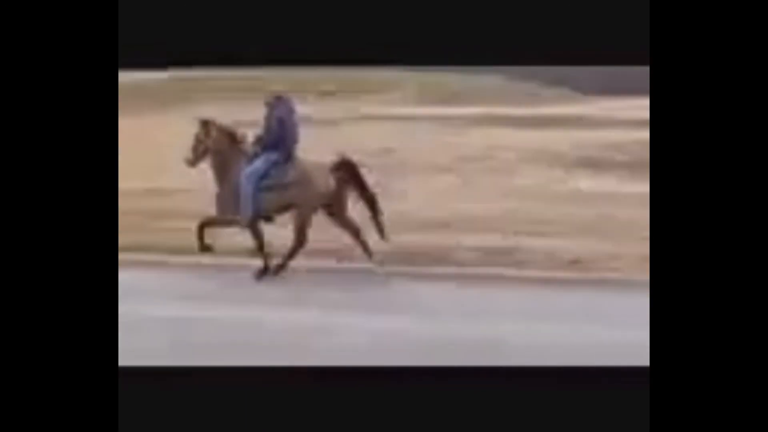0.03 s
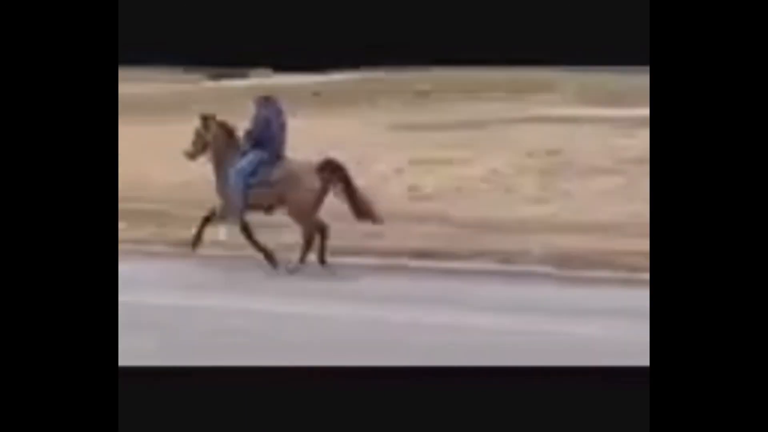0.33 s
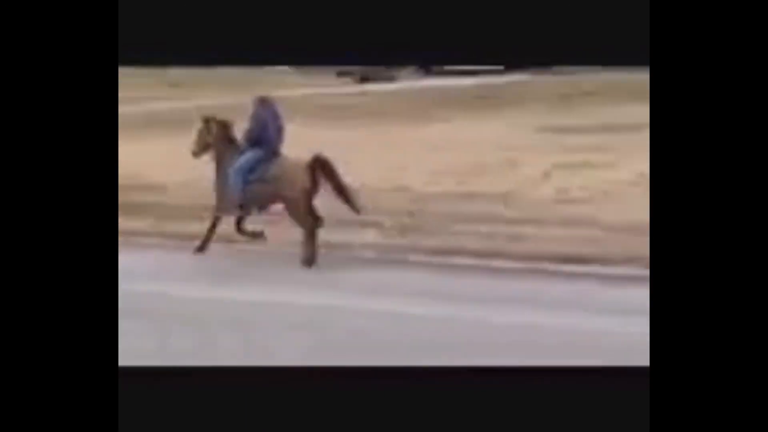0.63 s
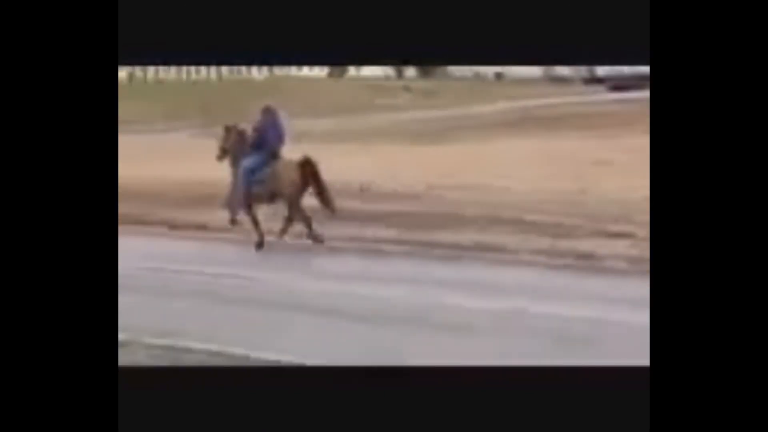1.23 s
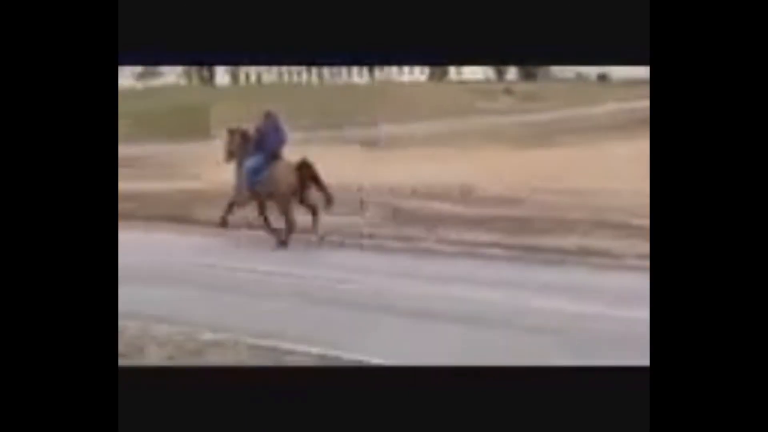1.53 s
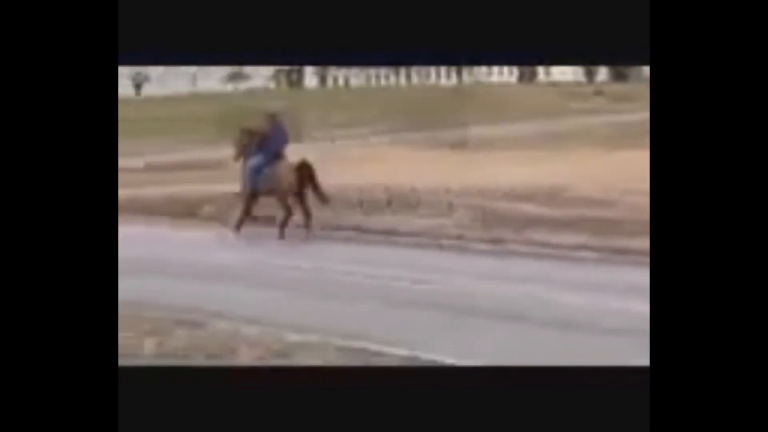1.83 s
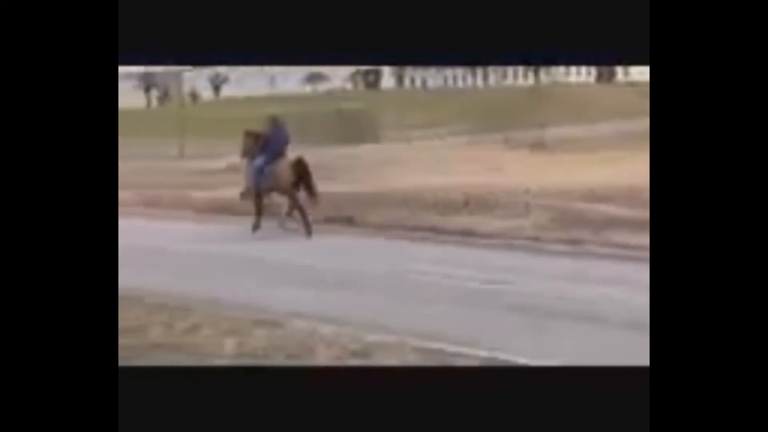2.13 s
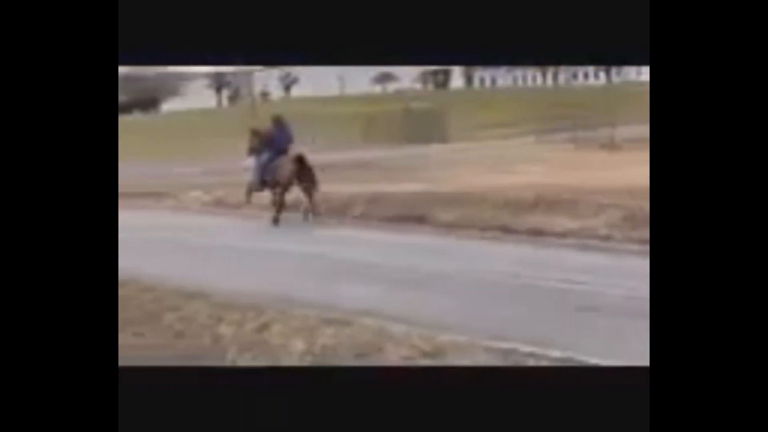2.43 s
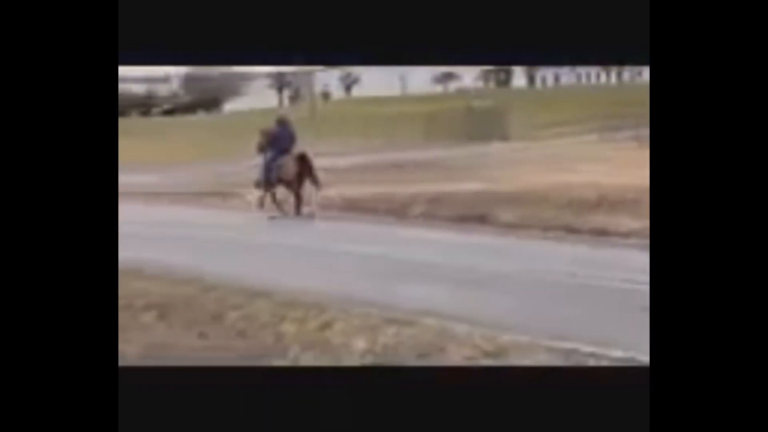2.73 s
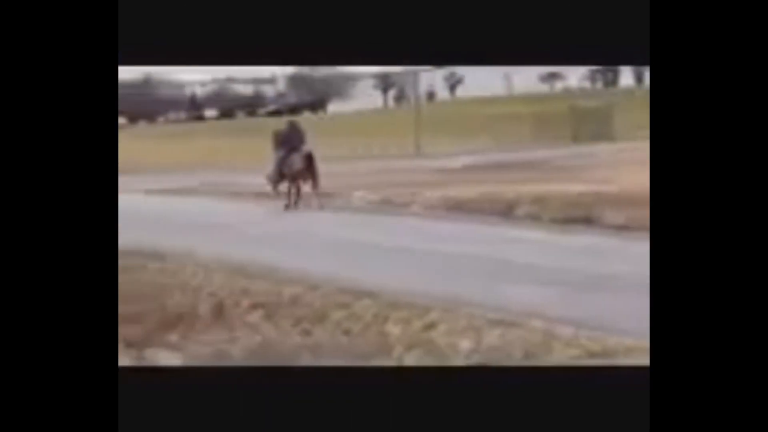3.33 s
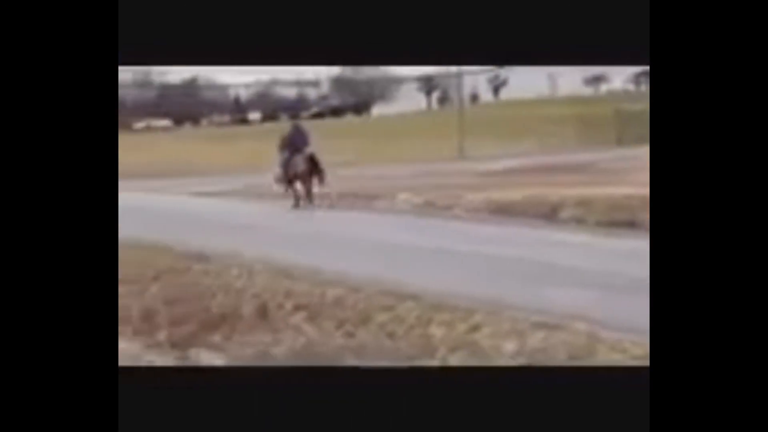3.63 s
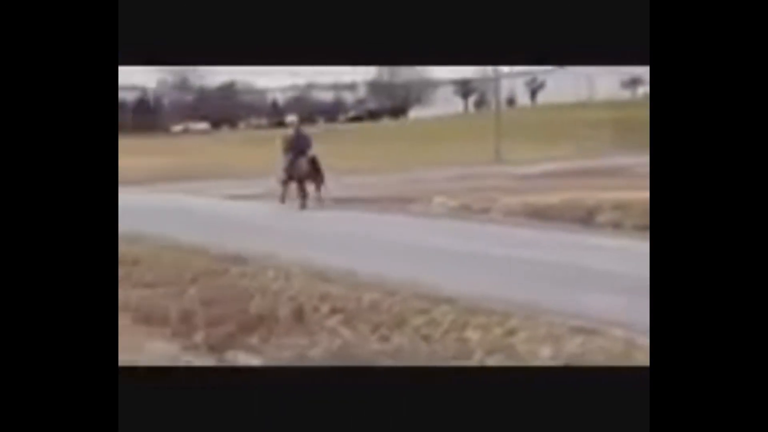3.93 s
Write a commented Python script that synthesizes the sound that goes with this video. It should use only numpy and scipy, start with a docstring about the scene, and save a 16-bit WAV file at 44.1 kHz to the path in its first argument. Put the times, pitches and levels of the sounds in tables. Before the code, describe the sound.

A horse's hooves clop on a paved road in a quick, even rhythm, each step with a little grit. The beats thin slightly as it moves away from the microphone, over faint swishes and a low outdoor rumble.

```python
"""A ridden horse moves away along a paved road at a quick, even four-beat gait, outdoors.
Each hoof touches with one edge, then lands flat: the hoof and the hollow under it ring with a clop
while a little grit grinds on the road. The verge throws back a thin tail. Faint swishes fall between
the beats, over a bed of low rumble and hiss with a few soft bumps of wind."""
import sys
import numpy as np
from scipy import signal
from scipy.fft import rfft, irfft
from scipy.io import wavfile

SR = 44100
rng = np.random.default_rng(int(sys.argv[2]) if len(sys.argv) > 2 else 0)


def pcm_store(signal):
    """Save signal as 16-bit PCM."""
    levels = np.round(np.clip(np.atleast_2d(signal), -1, 1) * 32767)
    wavfile.write(sys.argv[1], SR, levels.astype(np.int16).T)


N = 176400
TIME = np.arange(N) / SR

# EQ curve of the outdoor rumble: f/Hz, level/dB
RUMBLE_EQ = [(25, -33.5), (50, -18), (65, -6.5), (82, 1.5), (115, -4), (150, -10), (220, -13.5), (320, -29),
             (600, -37.5)]
# EQ curve of the airy hiss: f/Hz, level/dB
AIR_EQ = [(150, 2), (900, 0.5), (1600, -6), (2600, -9), (4000, -31.5), (4700, -33), (5400, -49.5),
          (11000, -46.5)]
# cues for the bumps of wind: t/s, level/dB
WIND_CUES = [(1.708, -35), (2.422, -32.5), (2.602, -29.5), (2.727, -28.5), (3.04, -35), (3.885, -39.5)]
# cues for the swishes: t/s, relative level/dB
SWISH_CUES = [(0.847, -46), (0.99, -50), (1.325, -50.5), (1.71, -48.5), (1.953, -46), (2.079, -49),
              (2.201, -44), (2.451, -45.5), (2.567, -43.5), (2.686, -43.5), (2.949, -44.5), (3.046, -48),
              (3.155, -44), (3.273, -46), (3.435, -48)]
# EQ curve of a swish: f/Hz, level/dB
SWISH_EQ = [(400, -19.5), (1400, -6.5), (2200, 4), (3000, -10.5), (4000, -33), (6000, -60)]
# EQ curve of road grit for a hoof pitched at GRIT_PITCH_HZ; it slides with the pitch: f/Hz, level/dB
GRIT_EQ = [(150, -12), (400, -11.5), (680, -3), (1100, 2.5), (1550, -0.5), (2100, -15), (2700, -9.5),
           (4500, -11.5), (10000, -25.5)]
# resonances of the hoof and the hollow under it: f/pitch, level/dB
CLOP_MODES = [(0.492, -25), (.69, -12.5), (0.998, 35), (1.169, -9.5), (1.38, -13.5), (1.661, -11),
              (2.249, -14.5), (2.749, -15.5)]
# hoof falls, levels before the layer trims: t/s, landing level/dB, pitch/Hz, unstifled ring t60/s,
# treble shelf/dB, lead of the edge touch/s, touch level/dB, grit level/dB
HOOF_CUES = [(0.0723, -17, 1170, 0.021, 5, 0.0053, -18, -28),
             (0.1884, -16, 1259.0, 0.01, -3, 0.0047, -23, -20),
             (0.31, -15.5, 1003.0, 0.023, 2.5, 0.0088, -16.5, -30.5),
             (0.4336, -15, 1188, 0.02, 1.5, 0.0073, -21, -24),
             (0.5487, -15, 1160, 0.011, 2.5, 0.0062, -22, -31.5),
             (0.684, -11, 1154, 0.049, -0.5, 0.0035, -29.5, -23),
             (0.7947, -14.0, 1015, 0.022, -6, 0.0072, -15, -28.5),
             (0.914, -21.5, 1140, 0.01, -0.5, 0.0048, -37.5, -24.0),
             (1.0372, -16, 1083, 0.022, 4, 0.0064, -27.5, -34.5),
             (1.0695, -23, 937, 0.02, 9, 0.0043, -38, -43),
             (1.1672, -14.5, 1028, 0.046, 2, 0.0043, -30.0, -29.5),
             (1.2789, -13.5, 1083, 0.026, 0.5, 0.006, -18.5, -29.5),
             (1.3972, -14, 1167, 0.015, -1, 0.003, -26.5, -22),
             (1.5231, -16.5, 1200, 0.0077, -2.5, 0.0059, -20.5, -28.5),
             (1.556, -27.0, 1040, 0.024, 1.5, 0.0075, -49, -49.5),
             (1.6502, -11.5, 1134, 0.054, 1.5, 0.0031, -32, -20.5),
             (1.7733, -18.5, 1070, 0.034, 2.5, 0.0069, -21, -31.0),
             (1.8886, -14.5, 1240, 0.0091, -2, 0.0064, -39, -23),
             (2.0168, -17, 1173, 0.013, -2.5, 0.0085, -24.5, -31.5),
             (2.1361, -14.5, 1053, 0.0087, 1, 0.0045, -38, -25),
             (2.2549, -17.5, 1067, 0.018, -4.0, 0.0083, -21, -26.5),
             (2.34, -21, 933.0, 0.0063, -11.5, 0.0095, -51.5, -43.0),
             (2.3854, -25.5, 1293, 0.0067, -4.5, 0.0021, -37, -20.5),
             (2.5023, -19, 1130, 0.026, -2.5, 0.0042, -18, -28.5),
             (2.619, -17, 1040, 0.04, 3, 0.0046, -29.5, -23.5),
             (2.7362, -15.5, 987, 0.011, -1.5, 0.0082, -23, -28),
             (2.8797, -12.5, 1315, 0.012, -7, 0.0077, -48, -23.5),
             (2.9857, -15, 1180, 0.014, -4.5, 0.0051, -18, -31),
             (3.0933, -14.0, 1082, 0.054, -2, 0.0033, -35, -20.5),
             (3.2076, -16.5, 995, 0.02, 5, 0.0074, -24, -34),
             (3.3647, -16, 1130, 0.015, -3, 0.0083, -40, -23.5),
             (3.4749, -18.5, 1047, 0.017, 3, 0.0048, -28, -33),
             (3.5878, -28.5, 1030, 0.021, 4.0, 0.0022, -40, -26.0),
             (3.69, -20.5, 1020, 0.035, -1.5, 0.0039, -36, -32.0),
             (3.8391, -17.0, 1240, 0.0095, -1.5, 0.0041, -39, -24.5),
             (3.9345, -19, 1136, 0.026, 0, 0.0029, -24, -31.5)]

CLOP_DB, TOUCH_DB, SKID_DB, SNAP_DB, PEBBLE_DB = -2.5, -8.5, -3, -6.5, -7.5   # layer trims
SKID_RISE_S, TOUCH_DECAY_S, SNAP_DECAY_S, GRIND_S, PEBBLE_FADE_S = .0029, .0075, .001, .013, .024
GRIT_PER_S, PEBBLES_PER_S, GRIT_PITCH_HZ = 4500, 260, 1142
BODY_DB, THINNING_DB_PER_S = 2, 1.5   # the clop thins as the horse moves away
DULL_HZ, TOP_LEAK_DB, TOP_HZ = 2739, -37.5, 9700   # steep treble roll-off, with a trace of top left in


def from_db(db):
    """Decibels to gain."""
    return 10 ** (np.asarray(db) / 20)


def rms_one(x):
    """Scale to rms 1."""
    return x / np.sqrt(np.mean(x ** 2) + 1e-20)


def bounded(shape):
    """Random deviations without wild outliers."""
    return np.clip(rng.standard_normal(shape), -1.4, 1.4)


def low_pass(x, hz, order):
    """Butterworth low-pass."""
    return signal.sosfilt(signal.butter(order, hz, fs=SR, output="sos"), x + 1e-18)


def coloured(x, curve):
    """Shape a sound with an EQ curve; white input keeps its power."""
    hz, db = np.transpose(curve)
    bins = np.maximum(np.fft.rfftfreq(len(x), 1 / SR), 1)
    gain = from_db(np.interp(np.log(bins), np.log(hz), db, right=-np.inf))
    return irfft(rfft(x) * rms_one(gain), len(x))


def uneven(x, ripple_db=4, spacing_hz=220):
    """Chance resonances: no two contacts have quite the same colour."""
    hz = np.fft.rfftfreq(len(x), 1 / SR)
    knots = np.arange(0, SR / 2, spacing_hz)
    gain = from_db(np.interp(hz, knots, ripple_db * bounded(len(knots))))
    return irfft(rfft(x) * rms_one(gain), len(x))


def shelves(x, body_db, bright_db, body_hz=980, bright_hz=1324):
    """A low shelf for body and a high shelf for brightness."""
    hz = np.fft.rfftfreq(len(x), 1 / SR)
    low, high = (hz / body_hz) ** 10, (hz / bright_hz) ** 10
    gain = from_db(body_db / (1 + low) + bright_db * high / (1 + high))
    return irfft(rfft(x) * gain, len(x))


def noise(curve):
    """Steady noise with the given EQ, rms about 1."""
    return coloured(rng.standard_normal(N), curve)


def drift(hz):
    """Smooth random modulation, rms 1."""
    return rms_one(low_pass(rng.standard_normal(N + SR), hz, order=2)[SR:])


def grains(per_s, size):
    """Random clicks of uneven size and either sign, rms 1."""
    return rms_one((rng.random(size) < per_s / SR) * bounded(size))


def add(out, sound, s):
    """Mix a sound in from time s."""
    i = int(s * SR)
    sound, i = sound[max(-i, 0):], max(i, 0)
    out[i:i + len(sound)] += sound[:max(len(out) - i, 0)]


def outdoor_bed(rumble_db=-44.5, air_db=-53.5, flutter_db=1.8):
    """Steady low rumble under a faint, fluttering hiss."""
    air = from_db(air_db + flutter_db * drift(hz=6.7)) * noise(AIR_EQ)
    return from_db(rumble_db) * noise(RUMBLE_EQ) + air


def wind_bumps(centre_hz=96.5, wander=.1575, width_s=.0098):
    """Each bump of wind is a few cycles of low throb under a bell-shaped swell."""
    hz = centre_hz * (1 + wander * drift(hz=90))
    throb = rms_one(np.sin(2 * np.pi * np.cumsum(hz) / SR))
    swells = sum(from_db(db) * np.exp(-.5 * ((TIME - s) / width_s) ** 2) for s, db in WIND_CUES)
    return swells * throb


def swishes(width_s=.0045, trim_db=1):
    """Brief gritty rubs between the beats, probably the tack."""
    out, t = np.zeros(N), TIME[:SR // 10]
    middle = t[-1] / 2
    swell = np.exp(-.5 * ((t - middle) / width_s) ** 2)
    for s, db in SWISH_CUES:
        rub = swell * grains(per_s=1200, size=len(t))
        add(out, from_db(db + trim_db) * uneven(coloured(rub, SWISH_EQ)), s - middle)
    return out


def verge(x, wet_db=-28, t60_s=.1, rise_s=.0033):
    """The verge scatters the sound back as a thin, short reverb tail."""
    t = TIME[:SR // 2]
    envelope = np.exp(-np.log(1000) * t / t60_s) * (1 - np.exp(-t / rise_s))
    tail = envelope * rng.standard_normal(len(t))
    return from_db(wet_db) * signal.fftconvolve(x, tail / np.linalg.norm(tail))[:N]


def pebbles(since):
    """A few loose stones, kicked up, tick on the road after the landing."""
    fade = (since > 0) * np.exp(-abs(since) / PEBBLE_FADE_S)
    return from_db(PEBBLE_DB) * fade * grains(PEBBLES_PER_S, len(since))


def grit(since, lead, landing_db, touch_db, grit_db):
    """Grit skids before the hoof lands flat, snaps at both contacts and grinds under the weight."""
    since_touch = since + lead
    skid = from_db(grit_db + SKID_DB) * np.exp(np.minimum(since_touch, 0) / SKID_RISE_S)
    edge_snap = from_db(touch_db + SNAP_DB) * (since_touch > 0) * np.exp(-abs(since_touch) / TOUCH_DECAY_S)
    flat_snap = from_db(landing_db + SNAP_DB) * np.exp(-abs(since) / SNAP_DECAY_S)
    grind = from_db(grit_db) * np.exp(-(since / GRIND_S) ** 2)
    pressure = np.where(since < 0, np.hypot(skid, edge_snap), np.hypot(flat_snap, grind))
    return pressure * grains(GRIT_PER_S, len(since))


def hoof_ring(t, pitch, t60, stifle_s=.009, detune=.03, scatter_db=3):
    """One blow rings the hoof and its hollow, stifled as the weight comes on; rms 1 over the first 4 ms."""
    ratio, db = np.transpose(CLOP_MODES)
    freedom = np.minimum(abs(ratio - 1) * 10, 1)   # the main mode barely varies from blow to blow
    stray_pitch, stray_level, stray_phase = freedom * bounded((3, len(ratio)))
    hz = pitch * ratio * (1 + detune * stray_pitch)
    gain = from_db(db + scatter_db * stray_level)
    phase = stray_phase * np.maximum(ratio - 1, 0)
    fade = np.exp(-np.log(1000) * t / t60 - (t / stifle_s) ** 2)
    ring = fade * (gain @ np.cos(2 * np.pi * np.outer(hz, t) + phase[:, None]))
    return ring / np.sqrt(np.mean(ring[:SR // 250] ** 2))


def hoofs():
    """Each step layers a short ring from the edge, the clop of the flat landing and a crunch of stones."""
    out, t = np.zeros(N), TIME[:SR // 5]
    landing = t[-1] / 2
    since = t - landing
    for s, landing_db, pitch, t60, bright_db, lead, touch_db, grit_db in HOOF_CUES:
        stones = grit(since, lead, landing_db, touch_db, grit_db) + from_db(grit_db) * pebbles(since)
        tuned_eq = np.multiply(GRIT_EQ, [pitch / GRIT_PITCH_HZ, 1])
        step = uneven(coloured(stones, tuned_eq))
        add(step, from_db(touch_db + TOUCH_DB) * hoof_ring(t, pitch, t60 / 2), landing - lead)
        add(step, from_db(landing_db + CLOP_DB) * hoof_ring(t, pitch, t60), landing)
        body_db = BODY_DB - THINNING_DB_PER_S * s
        add(out, shelves(step, body_db, bright_db), s - landing)
    return low_pass(out, DULL_HZ, order=7) + from_db(TOP_LEAK_DB) * low_pass(out, TOP_HZ, order=4)


def scene():
    """The mono mix: hoofs up front; their tail, the swishes and the open air behind."""
    clops = hoofs()
    return (clops + verge(clops) + swishes() + wind_bumps() + outdoor_bed())[None]


def record(dry, low_cut_hz=45, high_cut_hz=12500):
    """A small microphone loses the deep bass; the top is cut."""
    thin = signal.sosfilt(signal.butter(4, low_cut_hz, "high", fs=SR, output="sos"), dry)
    return low_pass(thin, high_cut_hz, order=12)


dry = scene()
out = record(dry)
pcm_store(out)
```